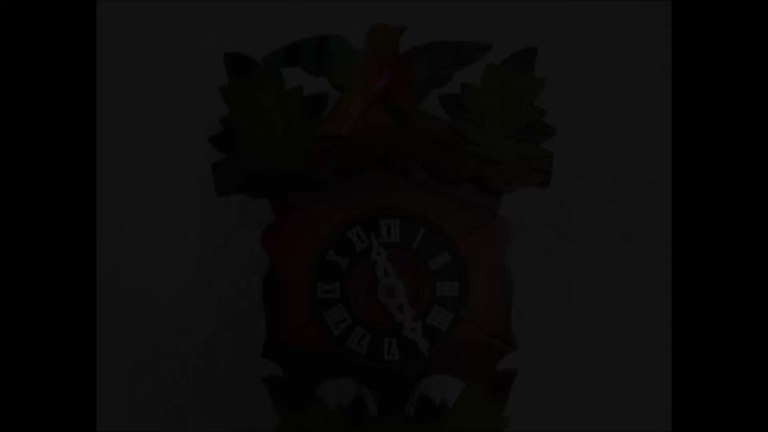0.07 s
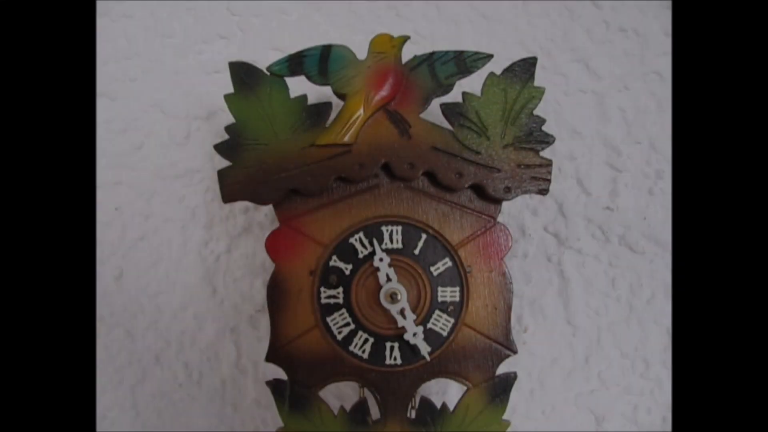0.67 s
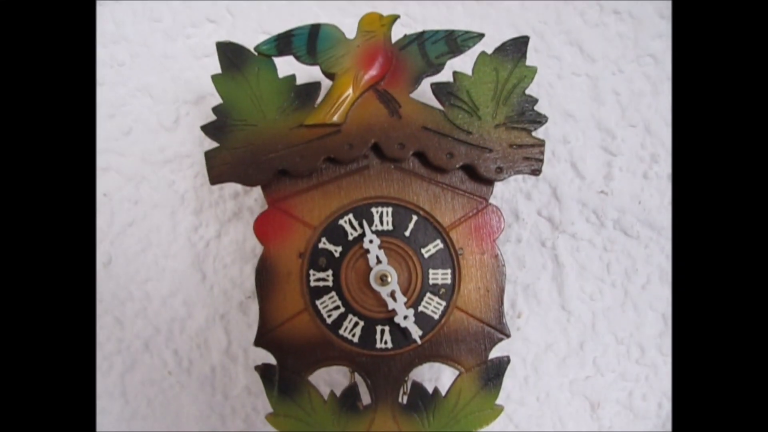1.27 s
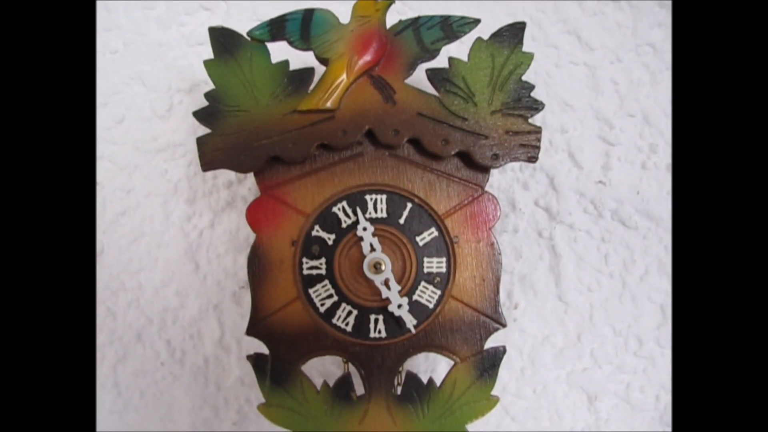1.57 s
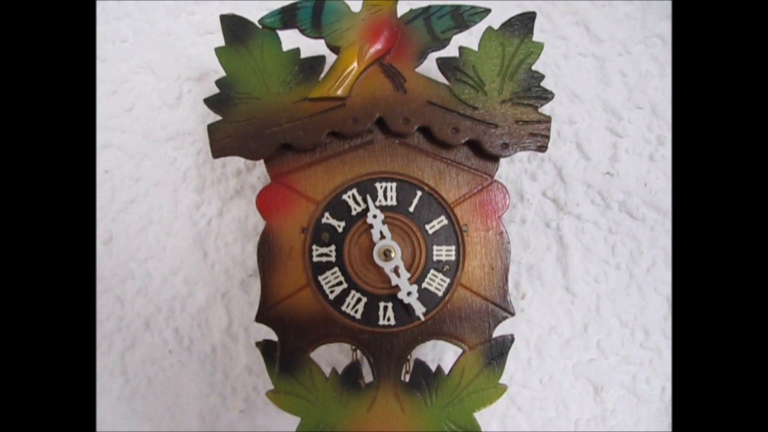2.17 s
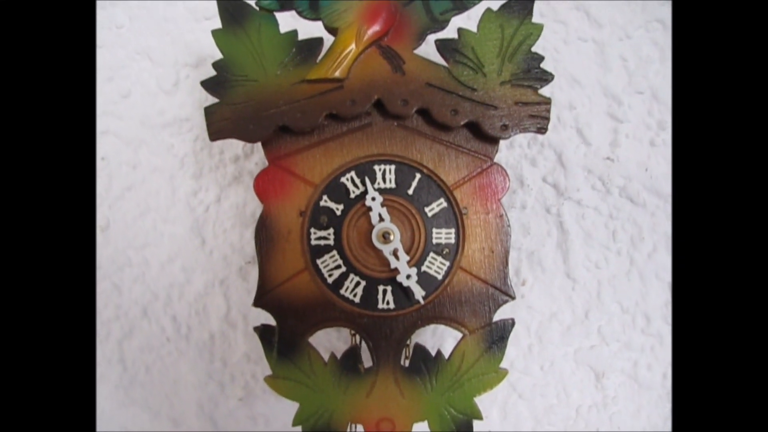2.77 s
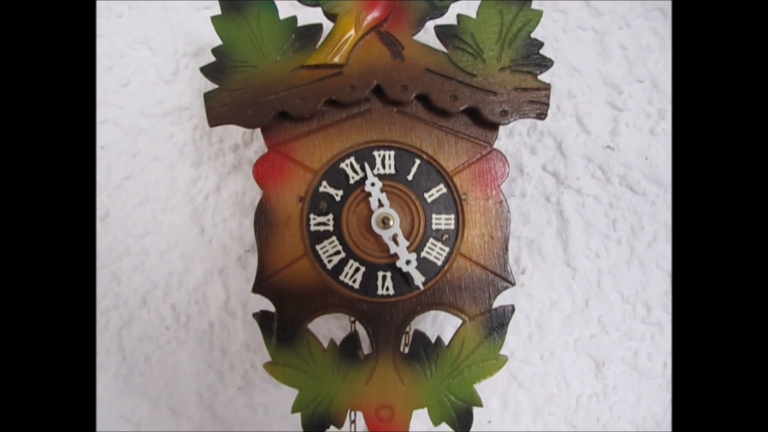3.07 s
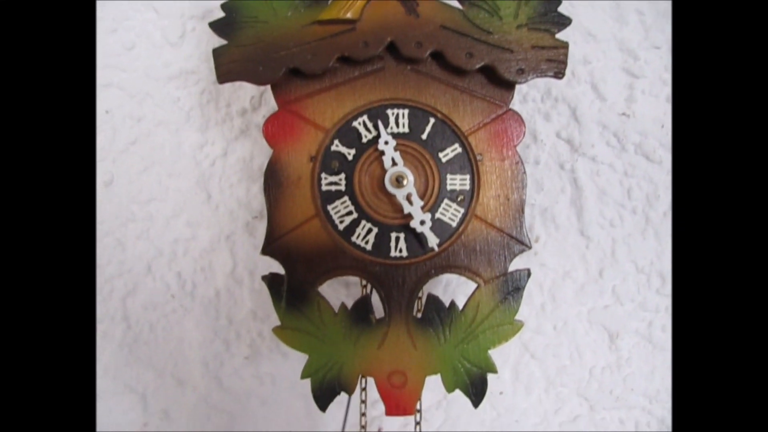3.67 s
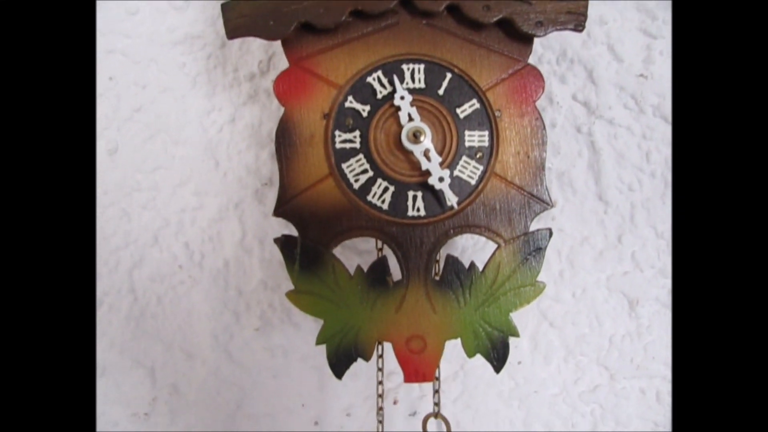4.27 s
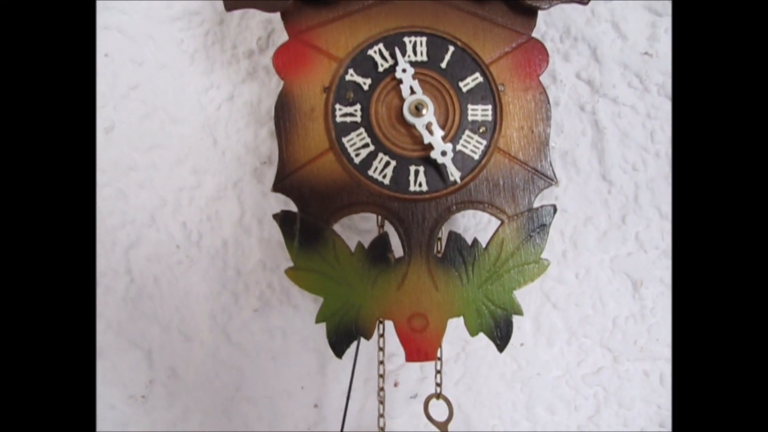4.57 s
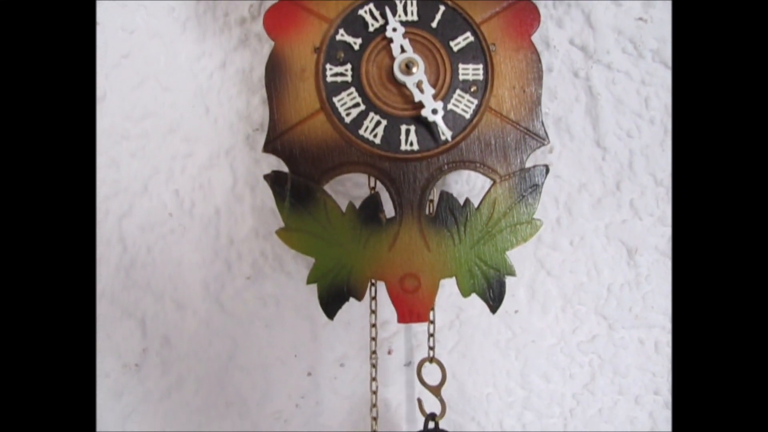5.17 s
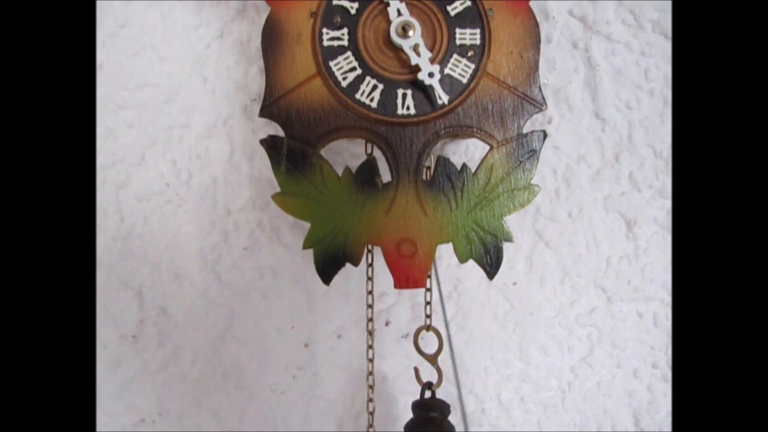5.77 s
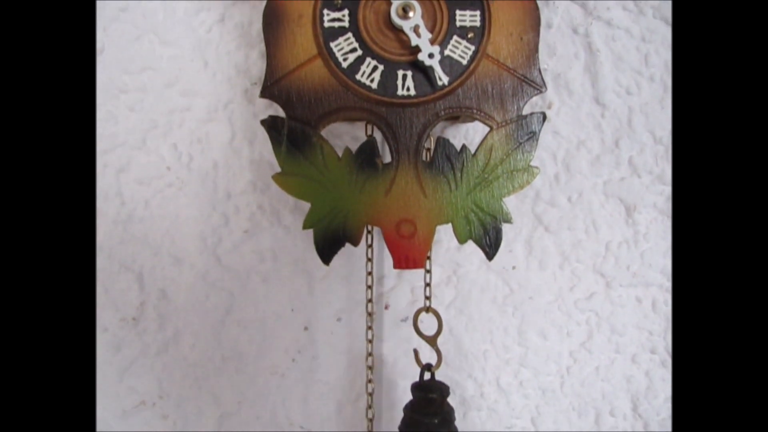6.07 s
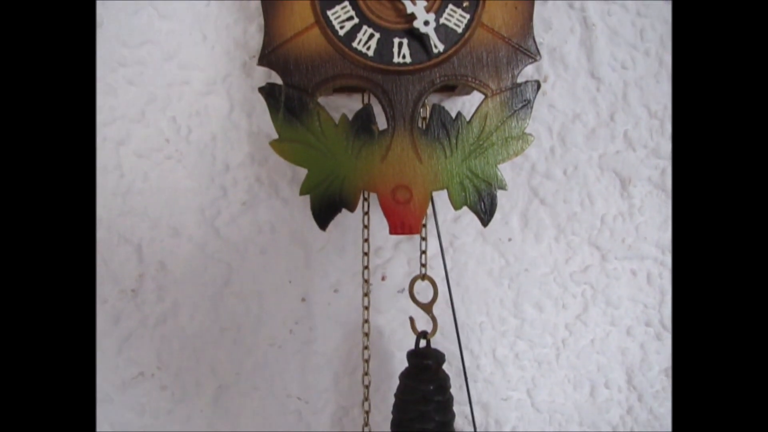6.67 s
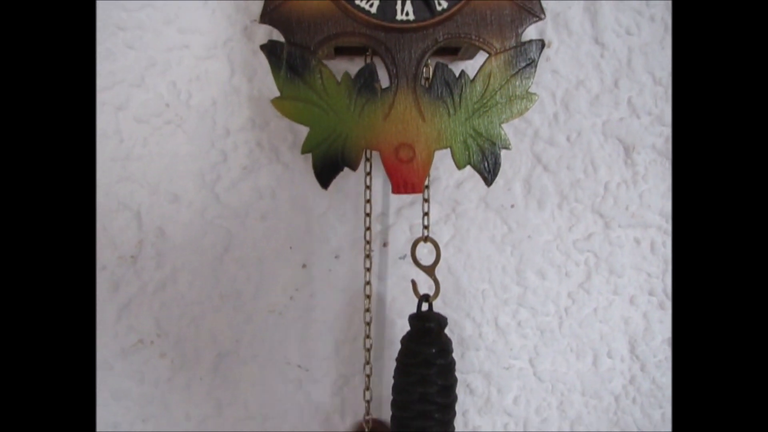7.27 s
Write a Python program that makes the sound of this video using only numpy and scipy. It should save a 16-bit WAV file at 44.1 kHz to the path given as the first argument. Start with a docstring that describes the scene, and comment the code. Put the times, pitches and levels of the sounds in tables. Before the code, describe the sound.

After a microphone pop and a click, a small wooden pendulum clock ticks nearby with dry, lightly metallic beats and soft hiss.

```python
"""Cuckoo clock in a quiet room

A small wooden clock on the wall ticks slightly out of beat, heard from nearby on a pocket camera.
At each swing an escape-wheel tooth drops on a pallet, chatters and rebounds, ringing the brass works
and the case. The camera's narrow-band microphone input pops as it opens; the camera clicks in the
hand and adds its own hiss and a faint whine."""
import sys
import numpy as np
from scipy import signal
from scipy.fft import rfft, irfft
from scipy.io import wavfile

SR = 44100
rng = np.random.default_rng(int(sys.argv[2]) if len(sys.argv) > 2 else 0)


def dump_mix(stems):
    """Bounce the given channels to the path in sys.argv[1] as a 16-bit WAV at rate SR."""
    frames = np.atleast_2d(stems).T  # one column per channel
    limited = np.clip(frames, -1, 1)  # hard clip at full scale
    pcm = np.round(limited * 32767).astype(np.int16)
    wavfile.write(sys.argv[1], SR, pcm)


N = 322812
TIME = np.arange(N) / SR
AGE = np.arange(SR // 3) / SR   # seconds since a blow


def from_db(db):
    """Decibels to gain."""
    return 10 ** (np.asarray(db) / 20)


def decay(t60):
    """Envelope that falls 60 dB in t60 seconds."""
    return 1000 ** (-AGE / t60)


def at_level(blow, db):
    """Set the rms of a blow's first 10 ms."""
    return from_db(db) * blow / np.sqrt(np.mean(blow[:SR // 100] ** 2))


def add(out, start_s, sound):
    """Mix a sound in at its start time."""
    i = round(start_s * SR)
    out[i:i + len(sound)] += sound[:N - i]


def gain_at(spectrum, hz):
    """Read a gain from (Hz, dB) rows on a log-frequency axis."""
    points, db = np.transpose(spectrum)
    return from_db(np.interp(np.log(hz + 1), np.log(points), db))


def ring(force, hz, t60):
    """A force sets one mode ringing; nothing radiates far below it."""
    radius, angle = 1000 ** (-1 / (t60 * SR)), 2 * np.pi * hz / SR
    return signal.lfilter([1, 0, -1], [1, -2 * radius * np.cos(angle), radius * radius], force + 1e-18)


def band(x, low_hz, high_hz):
    """Band-pass."""
    return signal.sosfilt(signal.butter(3, [low_hz, high_hz], "band", fs=SR, output="sos"), x)


# The noise floor at the microphone. Each row: frequency in Hz, relative density in dB.
HISS_SPECTRUM = [(25, -13), (70, -9), (250, -10), (400, -7), (620, -6.5), (900, -0.5), (1100, -11),
                 (1500, -11.5), (2300, -11), (3300, -14), (4200, -12.5), (4500, -16), (5300, -15.5),
                 (6000, -18.5)]
# Resonances that colour it. Each row: centre in Hz, width in Hz, relative peak density in dB.
HISS_RESONANCES = [(513, 77, -2.5), (682, 25, -1), (757.4, 34, 2), (992, 100, -0.5), (1148, 46, -4),
                   (1309, 72, -5.5), (2053, 45, -7), (2480, 90, -12)]

def hiss(level_db=-44):
    """Room air and camera hiss: steady noise with a few hollow resonances."""
    hz = np.fft.rfftfreq(N, 1 / SR)
    power = gain_at(HISS_SPECTRUM, hz) ** 2
    for centre, width, db in HISS_RESONANCES:
        power += from_db(db) ** 2 / (1 + 2 * ((hz - centre) / width) ** 2) ** 2
    noise = irfft(rfft(rng.standard_normal(N)) * np.sqrt(power), N)
    return from_db(level_db) * noise / noise.std()


# The camera's own tones. Each row: frequency in Hz, rms level in dB.
WHINE_TONES = [(5114, -68), (5145, -64.5)]

def camera_whine(waver_hz=3, waver_points=90):
    """Two thin tones waver slightly in pitch."""
    out = np.zeros(N)
    for hz, db in WHINE_TONES:
        waver = np.interp(TIME, np.linspace(0, TIME[-1], waver_points), rng.standard_normal(waver_points))
        phase = 2 * np.pi * np.cumsum(hz + waver_hz * waver) / SR
        out += np.sqrt(2) * from_db(db) * np.sin(phase)
    return out


# Handling noise, right at the microphone. Each row: start in seconds, level in dB,
# lower and upper band edge in Hz, t60 in seconds.
BODY_KNOCKS = [(0.144, -42.5, 190, 1200, .02), (0.2009, -37.5, 90, 704, 0.012),
               (0.224, -27.5, 550, 3240, 0.039), (5.984, -39.5, 400, 2480, 0.017),
               (6.131, -46.5, 33, 195, 0.042)]

def camera_knocks():
    """The hand knocks the camera body: short, dull bursts of noise."""
    out = np.zeros(N)
    for start_s, db, low_hz, high_hz, t60 in BODY_KNOCKS:
        burst = rng.standard_normal(len(AGE)) * decay(t60)
        add(out, start_s, at_level(band(burst, low_hz, high_hz), db))
    return out


# Flicks of the camera's button spring. Each row: start in seconds, level in dB.
BUTTON_FLICKS = [(.2046, -21), (0.208, -35), (0.214, -44)]
# The spring's modes. Each row: frequency in Hz, level in dB relative to the flick, t60 in seconds.
BUTTON_MODES = [(2218, -11, .05), (3357, -17.5, .45), (3520, -1, .042), (3914, -16, .05)]

def button_spring(rise_s=0.00032):
    """The flicked spring pings and buzzes against its stop."""
    out = np.zeros(N)
    for start_s, flick_db in BUTTON_FLICKS:
        for hz, db, t60 in BUTTON_MODES:
            envelope = from_db(flick_db + db) * decay(t60) * (1 - np.exp(-AGE / rise_s))
            swing = np.sin(2 * np.pi * hz * (AGE + start_s))   # in phase with the swing under way
            add(out, start_s, envelope * swing)
    return out


def tooth_force(rebound_ms, chatter, chatter_t60, rebound=0.83):
    """A tooth lands on its pallet, chatters and strikes again."""
    force = chatter * decay(chatter_t60) * rng.standard_normal(len(AGE))
    again = round((rebound_ms + rng.uniform(-.25, .25)) * SR / 1000)
    force[[0, again]] += 1, rebound
    return force


# Modes of the clock's works. Each row: frequency in Hz, t60 in seconds,
# relative level in dB from the entry pallet, the same from the exit pallet.
BRASS_MODES = [(1240, 0.0089, -14.5, -15), (1550, 0.034, -20.5, -15), (1874, 0.079, -7.5, -24),
               (2055, 0.028, -1, -2), (2196, 0.034, -6, -2), (2466, .025, 1, 2), (2800, 0.0071, -14, -16),
               (3280, 0.082, -12.5, -13.5), (3505, 0.0092, -4.5, 1.5), (3703, 0.034, -8.5, -4),
               (3910, 0.025, -8.5, -8), (4130, 0.045, -8, -5.5), (4470, 0.048, -16, -15.5),
               (4700, 0.011, -16.5, -14), (5050, 0.0065, -10, -11.5), (5257, 0.03, -12.5, -15)]

def brass_works(pallet, rebound_ms, tilt_db, vary_db=1.0, detune=0.0054):
    """Each mode takes its own share of the blow, and shifts a little from beat to beat."""
    out = np.zeros(len(AGE))
    for hz, t60, *pallet_db in BRASS_MODES:
        db = pallet_db[pallet] + tilt_db * np.log2(hz / 2500) + vary_db * rng.standard_normal()
        force = tooth_force(rebound_ms, chatter=0.047, chatter_t60=.06) * rng.choice([-1, 1])
        shifted_hz = hz * (1 + detune * rng.standard_normal())
        out += at_level(ring(force, shifted_hz, t60), db)
    return out


def crack(rebound_ms, db=-3, t60=0.022, rattle=.17, rattle_t60=0.081):
    """Both strikes radiate a short broad crack; the loose wheel train rattles on after them."""
    strikes = decay(t60) + np.roll(decay(t60), round(rebound_ms * SR / 1000))
    grit = (strikes + rattle * decay(rattle_t60)) * rng.standard_normal(len(AGE))
    return at_level(band(grit, low_hz=1700, high_hz=5800), db)


# Modes of the case on the wall. Each row: frequency in Hz, t60 in seconds, relative level in dB.
WOOD_MODES = [(308.4, 0.12, -4), (381, 0.085, -0.5), (502, 0.045, -2), (774, 0.096, -1.5), (852, 0.042, 4)]

def wooden_case(rebound_ms):
    """The box, shaken by the rattling works, swells into a low knock."""
    out = np.zeros(len(AGE))
    for hz, t60, db in WOOD_MODES:
        force = tooth_force(rebound_ms, chatter=0.11, chatter_t60=0.094)
        out += at_level(ring(force, hz, t60), db) * rng.choice([-1, 1])
    return out


# The ticks, direct to the microphone, on the entry and exit pallet in turn.
# Each row: start in seconds, level in dB, treble tilt in dB per octave.
TICKS = [(0.2637, -30.5, 0), (0.67, -33.5, 1.5), (1.1, -29.5, 1), (1.513, -33, 1.5), (1.9493, -29, 3),
         (2.3504, -31.5, -5), (2.787, -30, -3.5), (3.186, -32, -1), (3.621, -29.5, -4.5),
         (4.0224, -31.5, -3.5), (4.4471, -27.5, -2.5), (4.86, -30.5, -1.5), (5.296, -27.5, 2.5),
         (5.6967, -30, -0.5), (6.1321, -28, -2), (6.5421, -31, 0), (6.9839, -28, 2)]
# The entry pallet, then the exit pallet with its shorter drop. Each row: rebound delay in ms,
# case level in dB relative to the tick, gong wire level in dB at a typical tick.
PALLET_BLOWS = [(4.7, -12, -53.5), (3.2, -13, -58)]

def escapement():
    """The two pallets take turns, each with its own rebound; the case knocks in proportion to the blow."""
    out = np.zeros(N)
    for k, (start_s, db, tilt_db) in enumerate(TICKS):
        pallet = k % 2
        rebound_ms, case_db, _ = PALLET_BLOWS[pallet]
        tick = brass_works(pallet, rebound_ms, tilt_db) + crack(rebound_ms)
        add(out, start_s, at_level(tick, db))
        add(out, start_s, at_level(wooden_case(rebound_ms), db + case_db))
    return out


def gong_wire(hz=2768, t60=.3, typical_tick_db=-30.5, db_per_tick_db=3.2):
    """The harder beats, mostly those on the entry pallet, set the coiled gong wire ringing faintly."""
    out = np.zeros(N)
    tone = np.sin(2 * np.pi * hz * AGE) * decay(t60)
    for k, (start_s, db, _) in enumerate(TICKS):
        *_, gong_db = PALLET_BLOWS[k % 2]
        add(out, start_s, at_level(tone, gong_db + db_per_tick_db * (db - typical_tick_db)))
    return out


# Colour of the room's echo at the microphone. Each row: frequency in Hz, gain in dB.
ECHO_COLOUR = [(150, -3), (350, 6.5), (800, 1), (1500, 6.5), (2200, -1.5), (3500, -2.5), (5500, 0)]

def room_echo(direct, t60=.25, send_db=-11, build_s=0.0062):
    """Diffuse echoes build up within milliseconds and soon die."""
    echoes = rng.standard_normal(len(AGE)) * decay(t60) * (1 - np.exp(-(AGE / build_s) ** 2))
    colour = gain_at(ECHO_COLOUR, np.fft.rfftfreq(len(AGE), 1 / SR))
    response = irfft(rfft(echoes / np.linalg.norm(echoes)) * colour)
    return from_db(send_db) * signal.fftconvolve(direct, response)[:N]


def scene():
    """The clock in its room and the camera's own noises, at one microphone."""
    ticks = escapement()
    clock = ticks + room_echo(ticks) + gong_wire()
    return (clock + camera_knocks() + button_spring() + hiss() + camera_whine())[None]


def record(dry, open_s=.06963, pop_end_s=.07152, dc_offset=0.0043, voice_band_hz=5350, cutoff_hz=16000):
    """The narrow-band input sits at its negative rail for the first 2 ms after it opens: a sharp pop."""
    railed = np.where(TIME < pop_end_s, -1, dry + dc_offset)
    narrow = signal.sosfiltfilt(signal.butter(22, voice_band_hz, fs=SR, output="sos"), railed)
    opened = narrow * (TIME >= open_s)
    return signal.sosfilt(signal.ellip(10, .1, 70, cutoff_hz, fs=SR, output="sos"), opened)


dry = scene()
out = record(dry)
dump_mix(out)
```